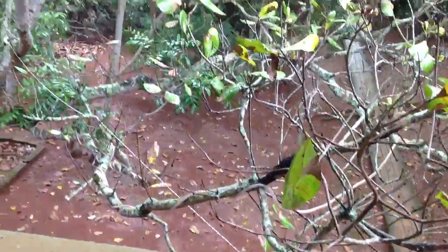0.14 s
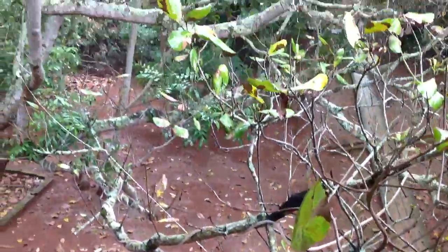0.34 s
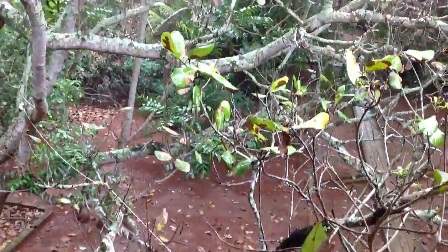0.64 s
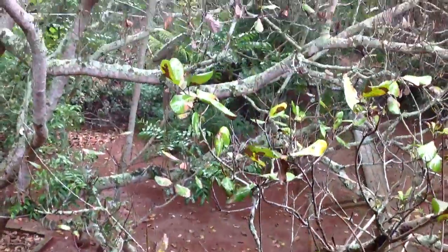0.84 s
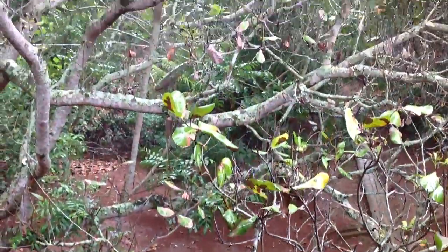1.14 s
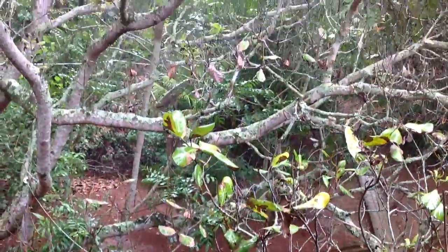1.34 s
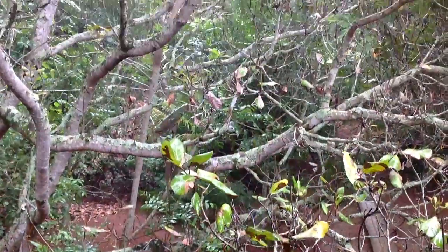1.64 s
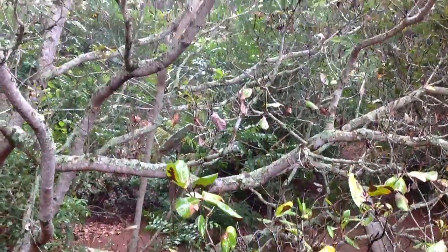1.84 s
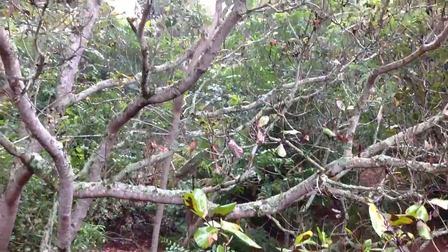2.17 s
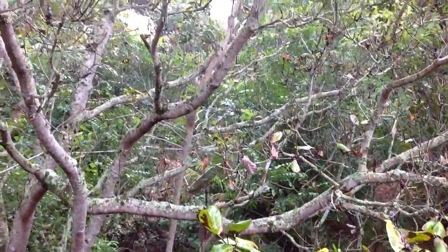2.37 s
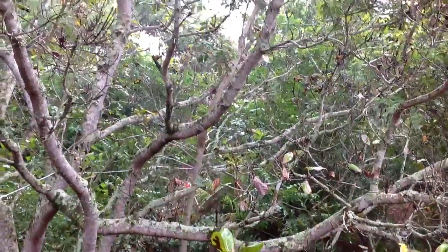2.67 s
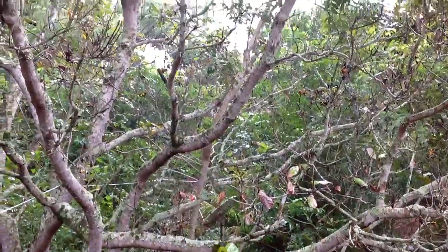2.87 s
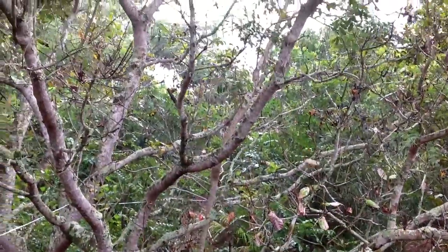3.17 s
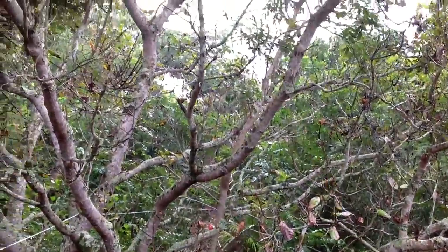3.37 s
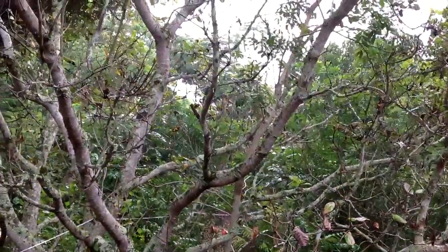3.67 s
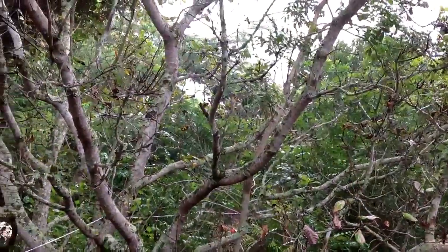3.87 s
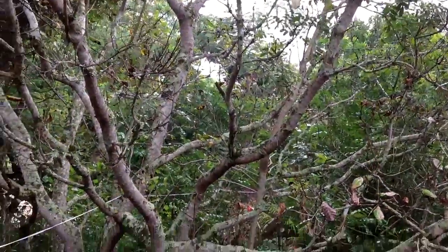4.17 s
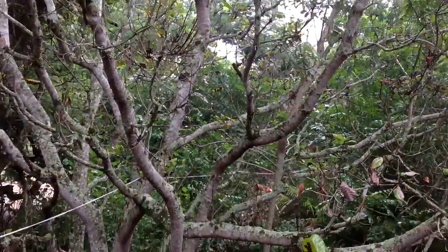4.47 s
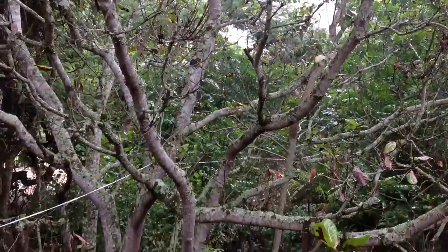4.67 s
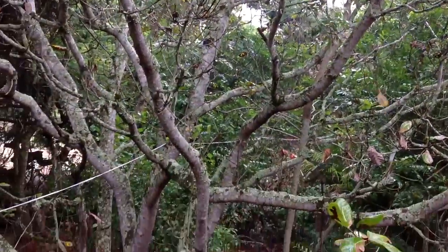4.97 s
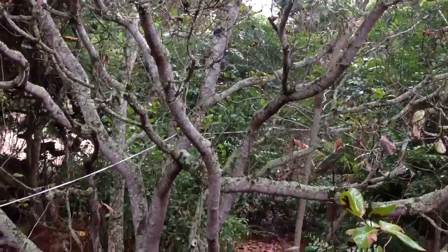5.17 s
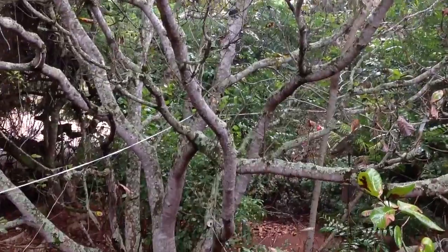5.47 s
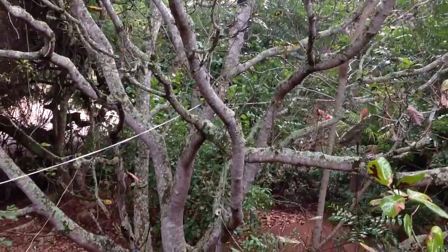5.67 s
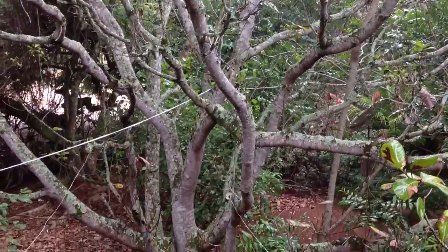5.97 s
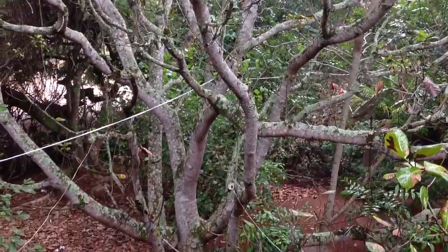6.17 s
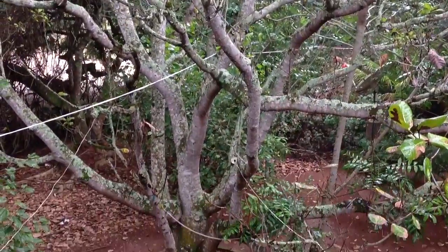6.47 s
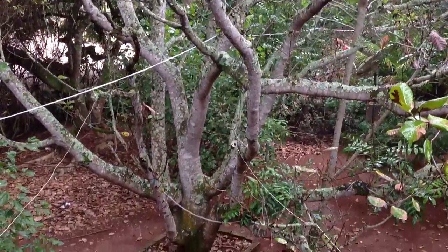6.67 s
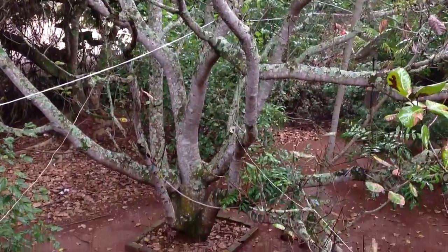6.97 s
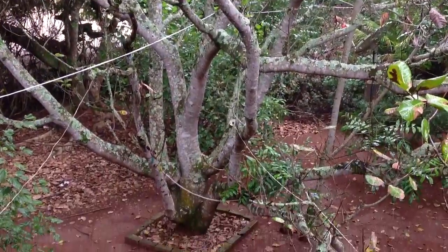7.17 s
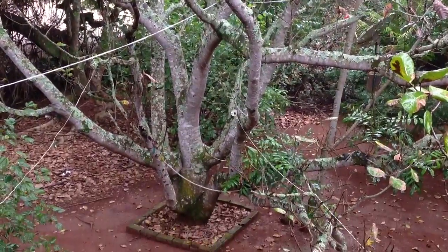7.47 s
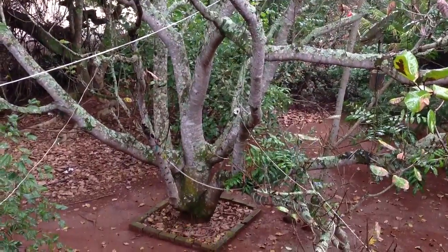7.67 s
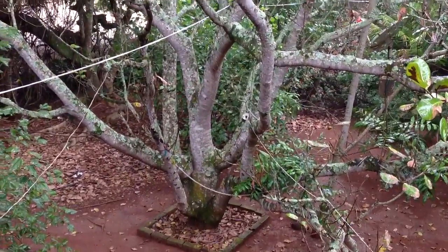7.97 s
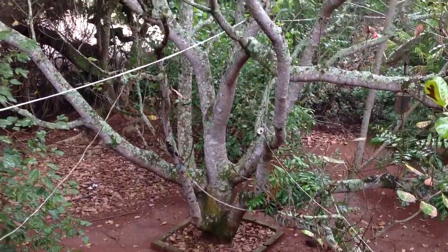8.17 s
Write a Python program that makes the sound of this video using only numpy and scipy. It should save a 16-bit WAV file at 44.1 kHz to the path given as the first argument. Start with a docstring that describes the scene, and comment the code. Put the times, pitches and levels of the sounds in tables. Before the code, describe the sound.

Steady rain falls on dense trees and undergrowth for the whole eight seconds or so. Countless distant drops blend into a soft wash with a bright hiss and little bass, while nearer ones make a fine, even patter on wet leaves. Heavy drips land irregularly on broad leaves close by, patting, splashing and sometimes softly plinking. Sharper ticks and drips stand out at about 0.8, 1.6, 2.6, 4.7, 5.2 and 6 seconds. Every so often the patter swells slightly for a moment as branches shed water. The rain is fullest in the first two seconds, then gradually becomes a little quieter without stopping. A tiny, very high squeak sounds in the trees at about 5.7 seconds, and a fainter one follows at 7 seconds. Close drops keep ticking over the softer rain until the end.

```python
"""Rain on dense foliage

Steady rain on trees and undergrowth is heard from a balcony, fading as the listener turns from the
nearest leaves. Countless far drops merge into a wash; nearer ones tick on wet leaves, and heavy drips
pat on broad leaves and scatter. Two tiny, very high squeaks sound in the trees."""
import sys
import numpy as np
from scipy import signal
from scipy.fft import rfft, irfft, next_fast_len
from scipy.io import wavfile
from scipy.ndimage import uniform_filter1d, map_coordinates

SR = 44100
rng = np.random.default_rng(int(sys.argv[2]) if len(sys.argv) > 2 else 0)


def to_wav(sig):
    """Store sig (one row per channel, or 1-D mono) as 16-bit WAV at the path in sys.argv[1].

    Samples outside -1..1 are clipped; the rate is SR.
    """
    pcm = np.clip(np.atleast_2d(sig), -1, 1) * 32767
    pcm = np.round(pcm).astype(np.int16)
    wavfile.write(sys.argv[1], SR, pcm.T)  # frames by channels


N = 367353

# Strength of the rain at the listener, used relative to its mean: time_s, level_db
RAIN_STRENGTH = [(0.0, -36.5), (0.07, -36), (0.49, -35), (0.65, -35.5), (1.6, -35.5), (2.16, -36.5),
                 (5.22, -38), (5.31, -38.5), (5.4, -37.5), (5.59, -39), (5.84, -39.5), (5.96, -38),
                 (6.31, -39), (7.26, -39.5), (8.33, -41)]
# Spectral shapes of the three rain layers: frequency_hz, gain_db
MURMUR_SPECTRUM = [(25, -50), (45, -49.5), (65, -38), (100, -17), (135, -7), (210, -1.5), (290, -0.5),
                   (400, -2.5), (620, 1), (1000, 0), (1750, -1), (5000, -58)]
PATTER_SPECTRUM = [(150, -35), (500, -10.5), (1000, -6.5), (1600, -3.5), (2600, 0), (3400, 0), (4500, -2),
                   (7000, -5), (15000, -18.5)]
SPRAY_SPECTRUM = [(500, -43.5), (2000, -2.5), (4000, -2), (6000, -2), (9000, -0.75), (12500, 0),
                  (15400, 0.5)]
# Drips on broad leaves: start_s, relative_level_db, pitch_hz, ring_cycles (1 a splat, over 4 a plink)
HEAVY_DRIPS = [(0.048, -26, 1900, 1), (0.085, -29, 2000, 1), (0.256, -25, 2900, 1),
               (0.328, -24.5, 2400, .9), (0.798, -25.5, 2730, 8), (0.906, -26.5, 2500, 1),
               (1.342, -28, 2000, 4), (1.615, -26, 4850, 8), (1.717, -33, 1800, 0.8), (2.187, -29, 1700, 1),
               (2.267, -36, 1550, 1), (3.122, -26, 4650, 8), (3.214, -27, 2700, 1), (3.651, -34, 1220, 3),
               (3.732, -26.5, 2550, 1.3), (3.812, -30, 2600, 1), (3.864, -28, 2700, 3),
               (4.365, -28.5, 1680, 14), (4.681, -23.5, 3380, 7), (4.77, -38, 570, 10),
               (4.81, -30, 2050, 10), (5.15, -33, 2500, 1), (5.184, -37.5, 1090, .8),
               (5.186, -25, 7500, .6), (5.253, -27, 3220, 6), (5.391, -36, 1400, 5), (5.627, -34, 1430, 10),
               (5.959, -29, 2800, 1.5), (6.067, -28, 2380, 3), (6.628, -29, 3100, 1.5),
               (6.895, -30, 3600, .8), (6.948, -30, 3100, 3), (6.979, -33, 1900, 1.5),
               (7.172, -33, 2700, 1), (7.336, -29.5, 3400, .8), (7.386, -29, 3300, .8),
               (7.77, -29.5, 2270, 7)]
# Branches shedding water: start_s, length_s, patter_swell_db (before weighting), spray_swell_db
BRANCH_FLURRIES = [(0.18, 0.17, 1.5, -0.5), (0.79, 0.33, 1, -0.5), (1.055, 0.098, 0, 1.5),
                   (1.338, 0.11, 2.5, 1.3), (1.54, 0.46, 0, 1.5), (2.485, 0.15, 1.5, 1.5),
                   (3.118, 0.14, 0.3, 0.5), (3.56, 0.46, 2.3, 1.2), (4.662, 0.35, 1.5, 0.5),
                   (5.125, 0.12, 1.5, 2), (5.41, 0.2, 0, 1.4), (5.89, 0.45, 1.5, -0.5),
                   (6.87, 0.25, 1.5, -0.5), (7.144, 0.11, 2, 0.5), (7.303, 0.15, 2.5, 1.5),
                   (8.02, 0.1, -0.5, 1.5)]
# Drops striking nearby leaves: start_s, level_db, pitch_hz
CLOSE_DROPS = [(0.2565, -20, 3200), (0.329, -20, 2900), (0.7677, -15.5, 5400), (1.121, -23, 12000),
               (1.2654, -20, 11000), (1.304, -22, 12500), (1.556, -21, 5000), (1.6154, -16.5, 5200),
               (1.9074, -20, 3930), (2.6228, -16, 10500), (3.1238, -20, 4300), (3.4316, -20, 5500),
               (4.3674, -19.5, 7000), (5.0416, -19.5, 7200), (5.1853, -17, 6500), (5.8947, -22, 5700),
               (5.9595, -22, 5000), (6.0118, -17, 10800), (6.012, -21, 3530), (6.158, -23, 7000),
               (6.4764, -21.5, 5300), (6.5188, -20.5, 6500), (6.6297, -21.5, 10000), (6.8095, -21, 7500),
               (7.0637, -22, 4200), (7.2005, -23, 8500), (7.303, -24, 6800), (7.3342, -19, 7200),
               (7.5919, -22, 9500), (7.7713, -23, 8800), (7.8214, -23, 4500), (7.955, -24, 5500),
               (8.015, -24, 9500), (8.0561, -20.5, 8500), (8.0743, -22.5, 4800)]
# Squeak tones, the first two overlapping: start_s, pitch_hz, level_db, length_s
SQUEAK_TONES = [(5.654, 15260, -25.5, .028), (5.658, 9130, -35, .014), (7.003, 15240, -35.5, .02)]


def amp(db):
    """Amplitude ratio of a level in decibels."""
    return 10 ** (np.asarray(db) / 20)


def unit(x):
    """Normalisation to an rms of 1."""
    return x / np.sqrt(np.mean(x ** 2) + 1e-20)


def wobble(knots_per_s):
    """Smooth random modulation: a spline through Gaussian values."""
    return map_coordinates(rng.standard_normal(1000), [np.arange(N) * knots_per_s / SR], mode="mirror")


def add(track, start_s, sound):
    """Superposition: a sound sums into the track from its start time."""
    room_left = track[max(round(start_s * SR), 0):][:len(sound)]
    room_left += sound[:len(room_left)]


def coloured(x, spectrum):
    """Minimum-phase filtering imposes a spectral shape causally; the result has an rms of 1."""
    size = 2 * next_fast_len(N // 2 + SR // 4)
    hz, db = np.transpose(spectrum)
    log_hz = np.log(np.fft.rfftfreq(size, 1 / SR) + 1)
    cepstrum = irfft(np.log(amp(np.interp(log_hz, np.log(hz), db))))
    response = np.exp(rfft(2 * cepstrum[:size // 2], size))
    return unit(irfft(rfft(x, size) * response, size)[:N])


def patchy_noise(depth_db):
    """Amplitude modulation of noise: its bands swell and sink independently."""
    bands = signal.stft(rng.standard_normal(N), nperseg=512)[2]
    patches = uniform_filter1d(rng.standard_normal(bands.shape), size=9, axis=0)
    patches = unit(uniform_filter1d(patches, size=10, axis=1))
    return unit(signal.istft(bands * amp(depth_db * patches), nperseg=512)[1][:N])


def impacts(count, centre_hz, spread_octaves, cycles, range_db, samples):
    """Spherical spreading: random drops ring their leaves, with amplitude inverse to distance."""
    when, place, pitch, life = rng.random((count, 4)).T
    hz = np.minimum(centre_hz * 2 ** (spread_octaves * (2 * pitch - 1)), SR / 2)
    distance = np.sqrt(place + amp(-2 * range_db))  # even cover of the ground outside a nearest radius
    turns = hz[:, None] * np.arange(samples) / SR
    rings = np.sin(2 * np.pi * turns) * np.exp(-turns / (cycles * (.5 + life[:, None])))
    strength = rng.choice([-1, 1], count) / distance
    indices = (when * N).astype(int)[:, None] + np.arange(samples)
    return unit(np.bincount(indices.ravel(), (rings * strength[:, None]).ravel(), N)[:N])


def scattered(x, t60_s, wet_db):
    """Scattering by trunks and leaves adds a short tail, different from place to place."""
    t, hop = np.arange(SR // 4) / SR, SR // 12
    out = x.copy()
    for start in range(0, N, hop):
        tail = rng.standard_normal(len(t)) * amp(-60 * t / t60_s)
        echo = signal.fftconvolve(x[start:start + hop], tail / np.linalg.norm(tail))
        add(out, start / SR, amp(wet_db) * echo)
    return out


def murmur(level_db):
    """Attenuation by the foliage between takes the treble from far rain."""
    return amp(level_db + 0.26 * wobble(9.1)) * coloured(patchy_noise(depth_db=.5), MURMUR_SPECTRUM)


def patter(level_db, swell_db):
    """Incoherent summation: far drops merge into a wash, while nearer ones tap the leaves singly."""
    taps = impacts(count=7000, centre_hz=2874, spread_octaves=0.9, cycles=0.69, range_db=8, samples=256)
    taps = unit(scattered(taps, t60_s=0.11, wet_db=2.0))
    taps *= amp(1.55 * swell_db)  # a flurry mostly brings separate near drops
    wash = amp(8.0 + 0.77 * swell_db) * patchy_noise(depth_db=1.0)
    return amp(level_db + 0.86 * wobble(16)) * coloured(taps + wash, PATTER_SPECTRUM)


def spray(level_db):
    """Brief impacts have broad spectra: small drops and splash droplets tick over a smooth hiss."""
    ticks = impacts(count=12000, centre_hz=9700, spread_octaves=0.91, cycles=0.6,
                    range_db=19.5, samples=64)
    ticks = unit(scattered(ticks, t60_s=0.17, wet_db=1.0))
    gain = amp(level_db + 0.39 * wobble(35))
    hiss = amp(4.0) * patchy_noise(depth_db=0.35)
    return gain * coloured(ticks + hiss, SPRAY_SPECTRUM)


def leaf_ring(hz, cycles, t):
    """Damped vibration of a struck leaf: it yields, so the pat starts softly before dying away."""
    age = 2 * hz * t / cycles
    return 2 * age * np.exp(-age) * np.sin(2 * np.pi * hz * t) / np.sqrt(cycles)


def heavy_drips():
    """Break-up on impact: gathered water pats a broad leaf and its droplets tap the leaves around."""
    out, t = np.zeros(N), np.arange(SR // 5) / SR
    droplets_per_s, splash_t60_s = 900, 0.11
    for start_s, level_db, hz, cycles in HEAVY_DRIPS:
        pat = leaf_ring(hz, cycles, t)
        landings = rng.random(len(t)) < droplets_per_s / SR
        droplets = landings * rng.standard_normal(len(t)) * amp(-60 * t / splash_t60_s)
        tap = leaf_ring(1.18 * hz, cycles=0.84, t=t)
        splash = unit(signal.fftconvolve(droplets, tap)[:len(t)]) * pat.std()
        splash *= amp(0.7) / cycles ** 0.25  # the longer a leaf rings, the less it splashes
        add(out, start_s, amp(level_db + 7) * (pat + splash))
    return out


def leaf_radiation(x, corner_hz):
    """A leaf small against the wavelength radiates poorly, so it gives almost no bass."""
    return signal.sosfilt(signal.butter(2, corner_hz, "high", fs=SR, output="sos"), x)


def flurries():
    """Level follows the flow of water: patter and spray swell as a branch sheds onto the leaves below."""
    swells_db, t = np.zeros((2, N)), np.arange(N) / SR
    rise_share = 0.46
    for start_s, length_s, *peaks_db in BRANCH_FLURRIES:
        ramp = np.interp((t - start_s) / length_s, [0, rise_share, 1], [0, 1, 0])
        swells_db += np.outer(peaks_db, np.sin(np.pi / 2 * ramp))
    return swells_db


def close_drops():
    """Impulsive excitation: a near leaf smacks for a few cycles, then thrown droplets sizzle briefly."""
    out, t = np.zeros(N), np.arange(SR // 10) / SR
    smack_t60_s, crack_t60_s, splash_t60_s = .0011, .003, .034
    for start_s, level_db, hz in CLOSE_DROPS:
        smack = np.sin(2 * np.pi * hz * t) * amp(-60 * t / smack_t60_s)
        crack = .19 * rng.standard_normal(len(t)) * amp(-60 * t / crack_t60_s)
        splash = amp(-11.5) * rng.standard_normal(len(t)) * amp(-60 * t / splash_t60_s)
        add(out, start_s, amp(level_db) * (smack + crack + splash))
    return out


def squeaks():
    """Slight frequency modulation unsteadies short, high tones, which echo in the trees."""
    out = np.zeros(N)
    for start_s, hz, level_db, length_s in SQUEAK_TONES:
        envelope = np.hanning(int(length_s * SR))
        pitch_hz = hz + 40 * wobble(400)[:len(envelope)]
        add(out, start_s, amp(level_db) * envelope * np.sin(2 * np.pi * np.cumsum(pitch_hz) / SR))
    return scattered(out, t60_s=0.24, wet_db=-7.5)


def scene():
    """Superposition of three layers led by one rain strength and single events, alike in both channels."""
    rain_db = np.interp(np.arange(N) / SR, *np.transpose(RAIN_STRENGTH))
    rain_db -= rain_db.mean()
    patter_swell_db, spray_swell_db = flurries()
    rain = (murmur(-47.5 + 0.67 * rain_db)
            + patter(-39 + 0.85 * rain_db, patter_swell_db)
            + spray(-35 + rain_db + spray_swell_db))
    near = leaf_radiation(close_drops() + heavy_drips(), corner_hz=450)
    mix = rain + near + squeaks()
    return np.array([mix, mix])


def record(dry):
    """Band limiting: an ideal low-pass filter passes nothing above its cutoff."""
    size, cutoff_hz = next_fast_len(N + SR // 2), 15340
    passband = np.fft.rfftfreq(size, 1 / SR) < cutoff_hz
    return irfft(rfft(dry, size) * passband, size)[:, :N]


dry = scene()
out = record(dry)
to_wav(out)
```